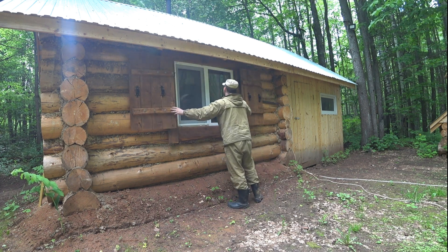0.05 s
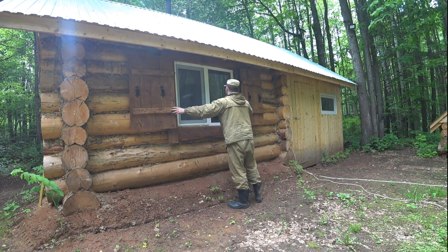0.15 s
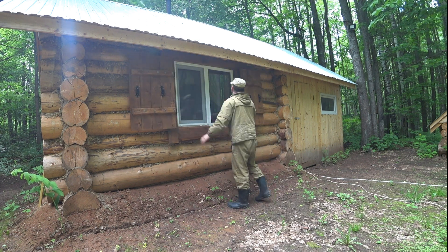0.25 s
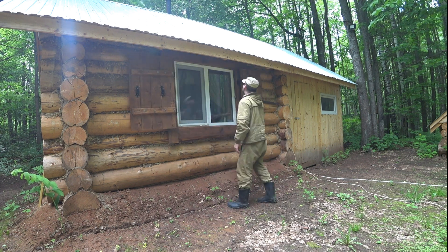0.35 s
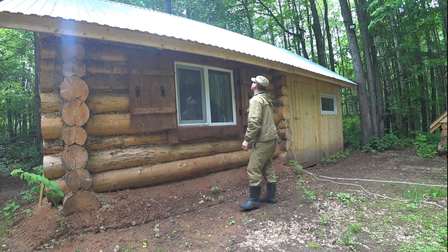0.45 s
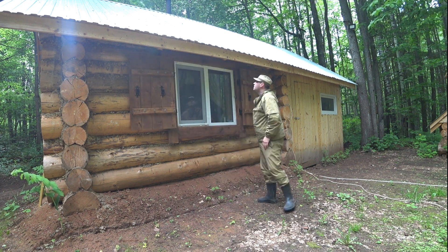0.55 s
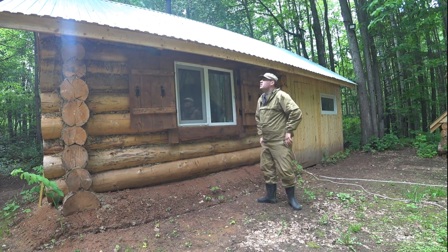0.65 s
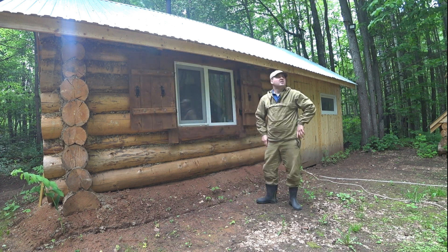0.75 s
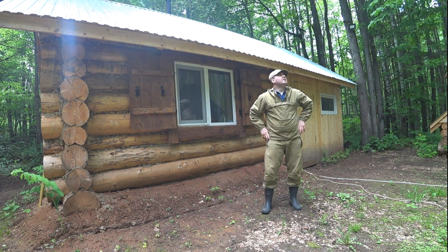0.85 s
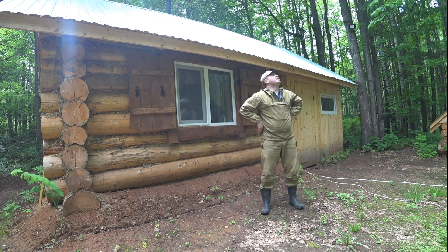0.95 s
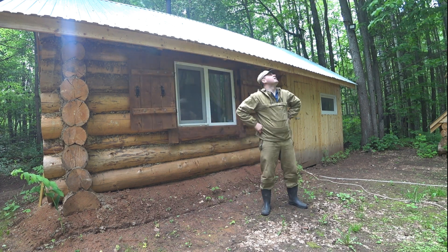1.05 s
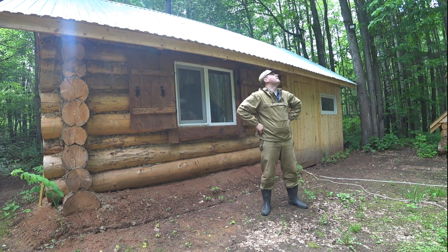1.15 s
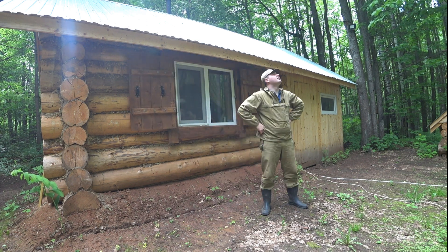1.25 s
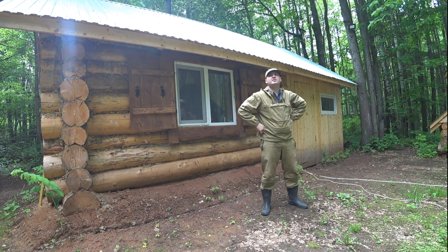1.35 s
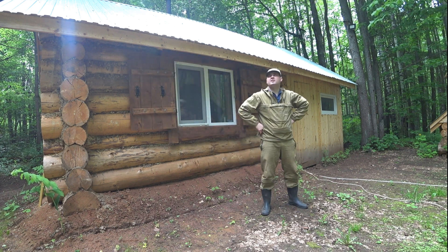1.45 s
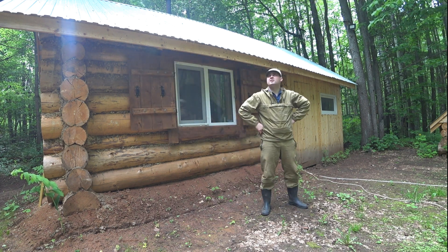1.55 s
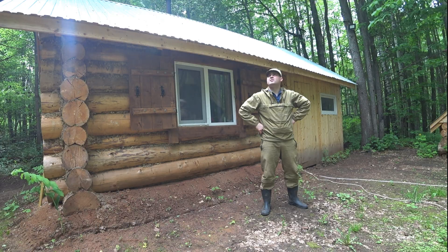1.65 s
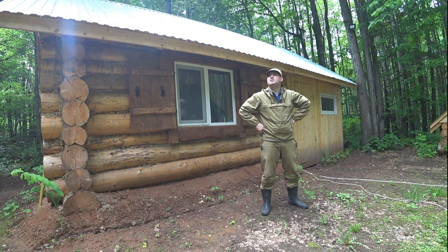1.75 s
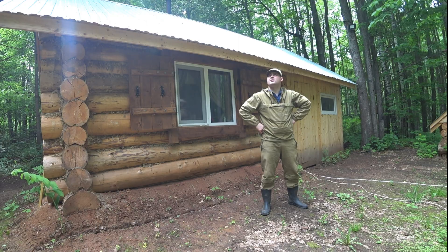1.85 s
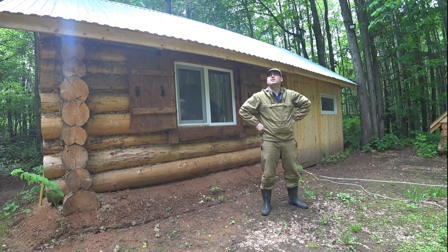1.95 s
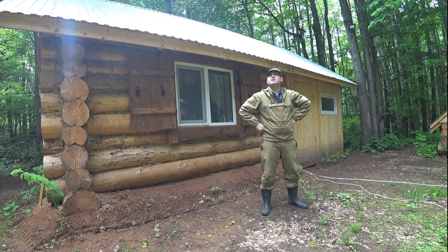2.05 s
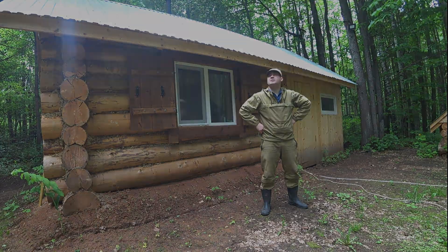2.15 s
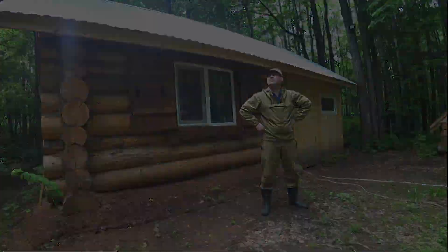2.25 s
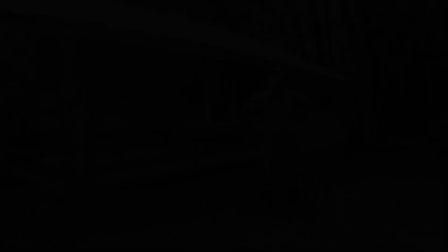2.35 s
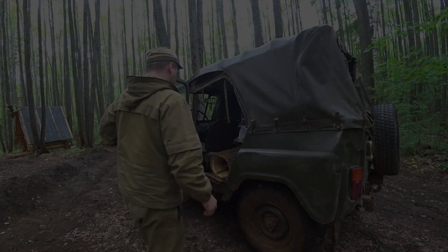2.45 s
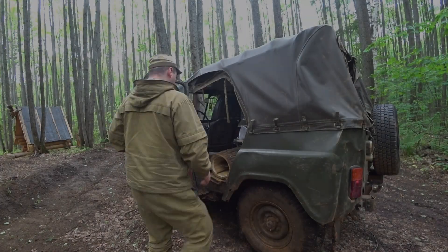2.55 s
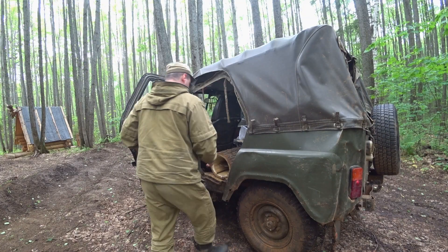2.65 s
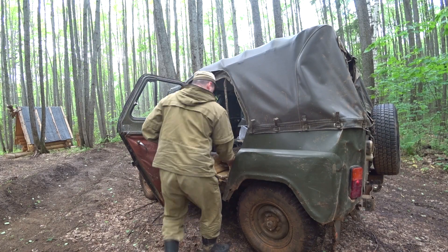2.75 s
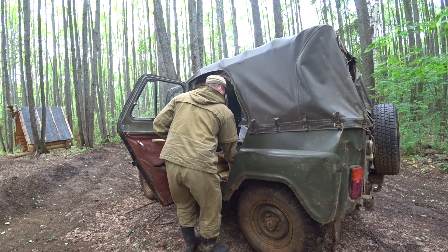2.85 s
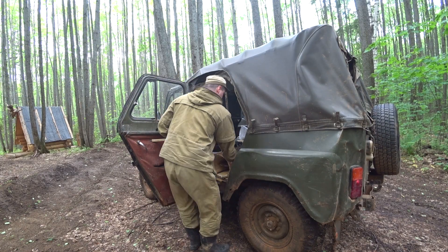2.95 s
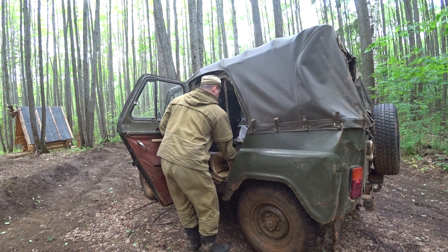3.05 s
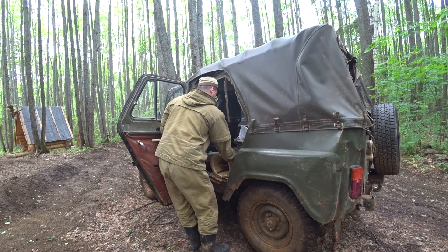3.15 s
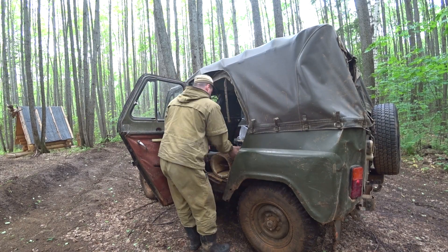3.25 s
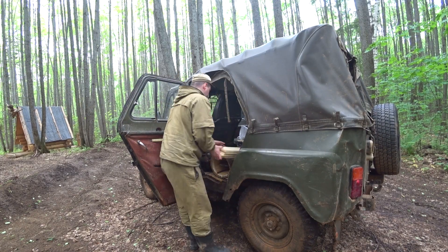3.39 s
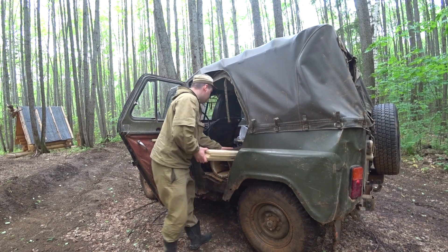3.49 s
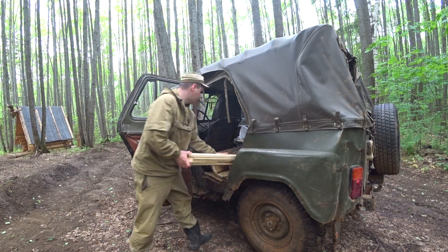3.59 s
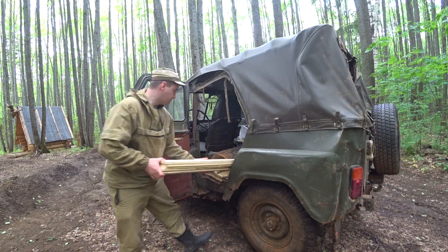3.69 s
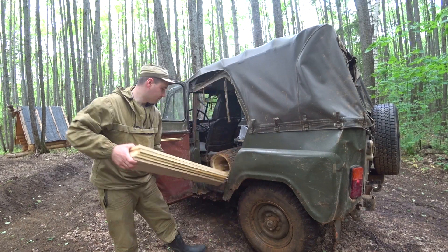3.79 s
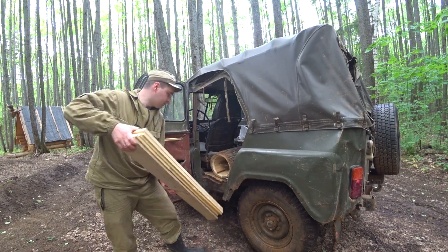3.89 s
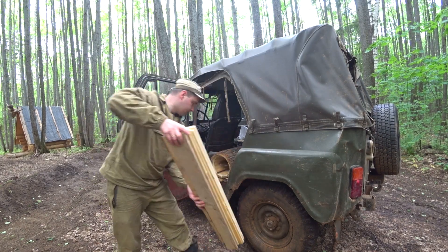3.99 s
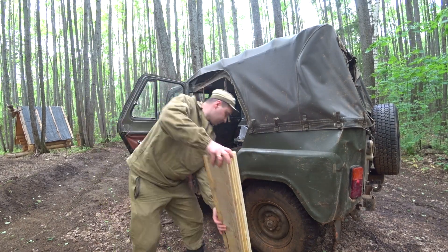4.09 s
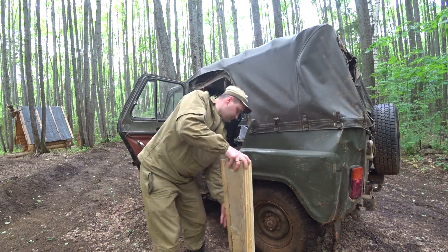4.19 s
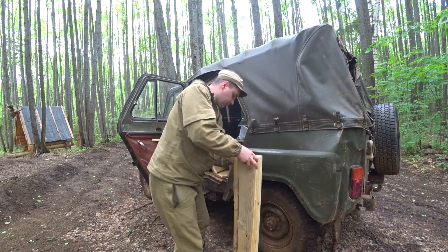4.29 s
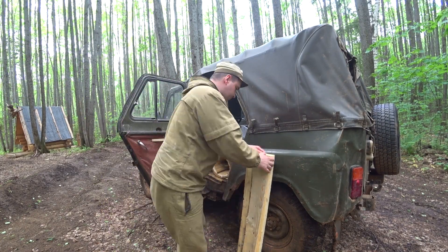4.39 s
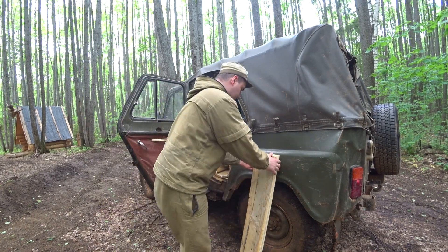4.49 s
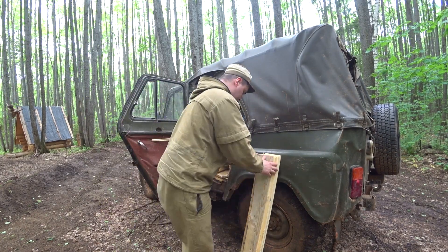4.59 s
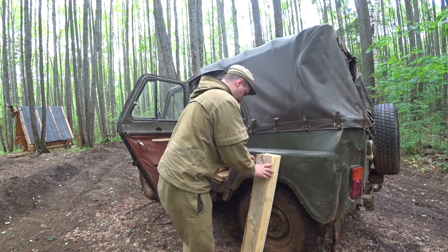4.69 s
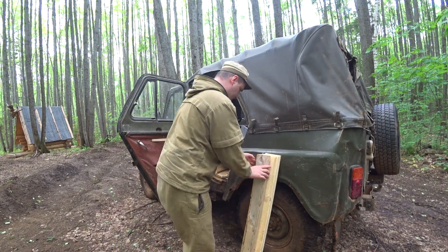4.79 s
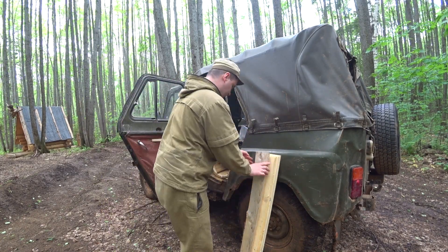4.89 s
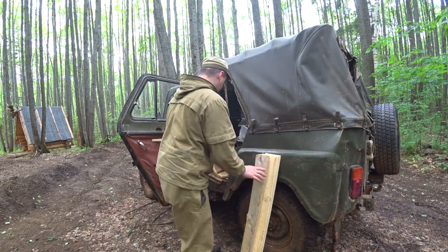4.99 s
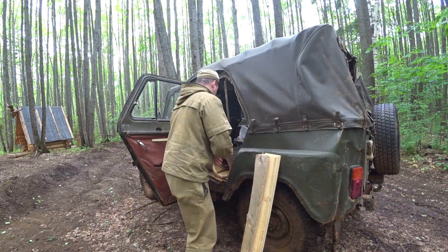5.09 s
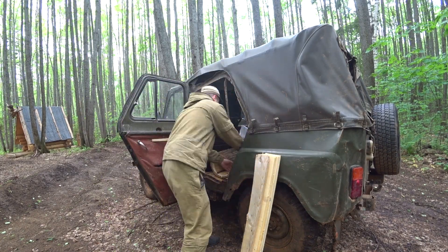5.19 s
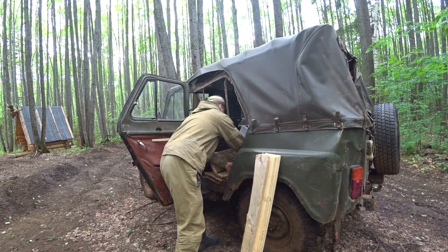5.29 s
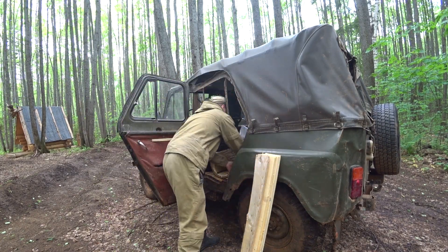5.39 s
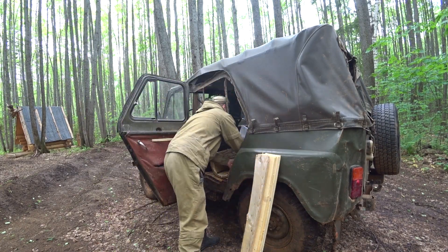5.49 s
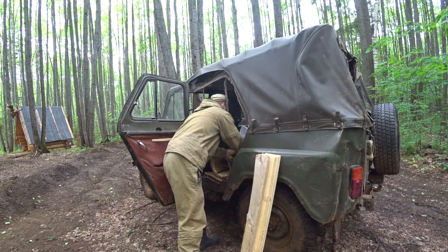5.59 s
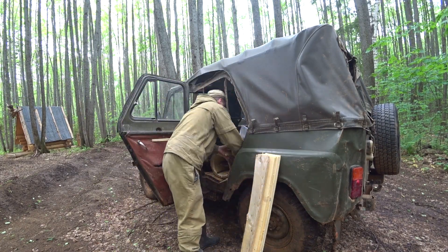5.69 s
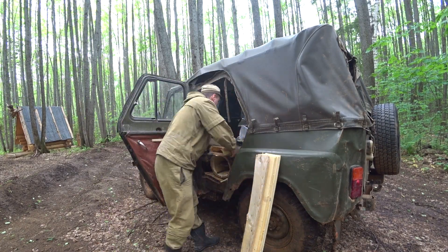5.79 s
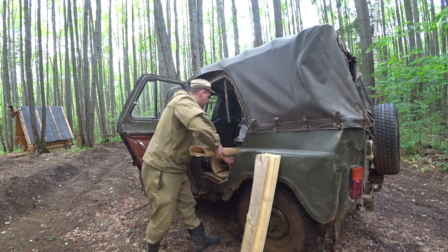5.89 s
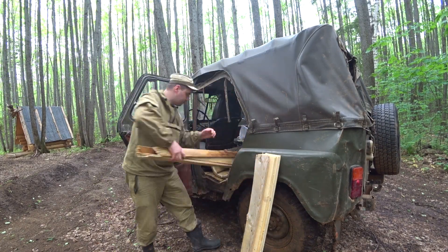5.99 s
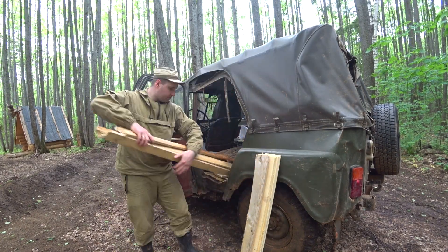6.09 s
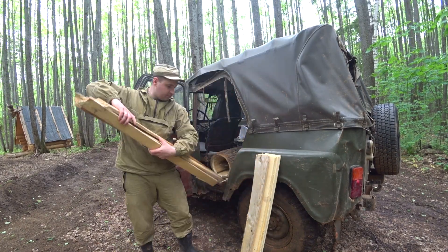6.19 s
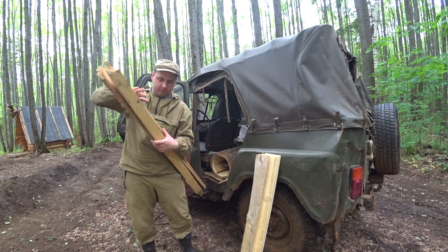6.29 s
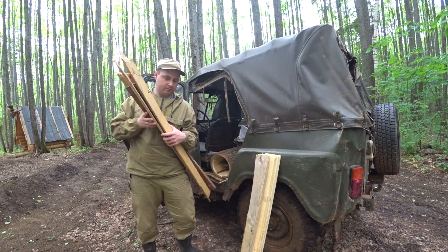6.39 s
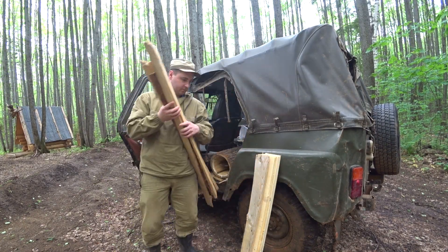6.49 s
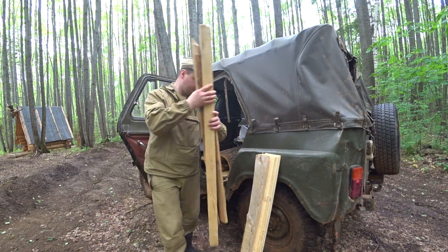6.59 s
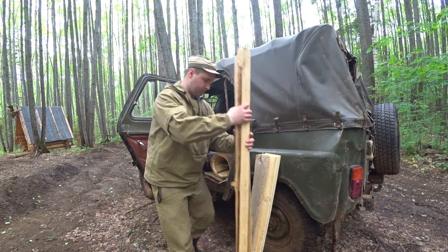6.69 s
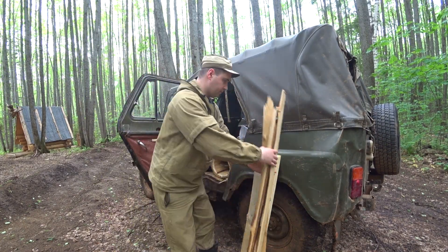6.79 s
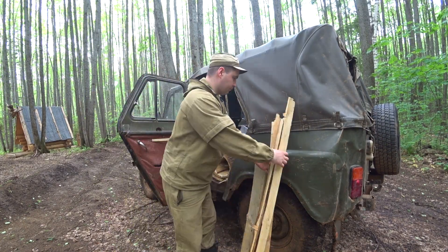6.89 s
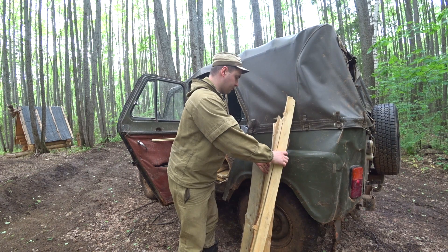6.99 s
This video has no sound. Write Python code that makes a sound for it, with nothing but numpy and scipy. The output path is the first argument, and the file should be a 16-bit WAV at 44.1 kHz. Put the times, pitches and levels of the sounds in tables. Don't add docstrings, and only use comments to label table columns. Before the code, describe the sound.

In a quiet forest, close to the microphone, a wooden shutter knocks softly while distant birds whistle thinly and leaves and cloth rustle. After a small rubber boot squeak, the air grows fuller. Planks rasp across a car sill, clap together and are stood on the ground with a hard, hollow crack. Thin laths then clatter, scrape and tap against the metal wing, all dry with hardly any echo.

```python
import sys
import numpy as np
from scipy import signal
from scipy.fft import rfft, irfft
from scipy.io import wavfile
from scipy.ndimage import uniform_filter1d

SR = 44100
rng = np.random.default_rng(int(sys.argv[2]) if len(sys.argv) > 2 else 0)


def transcribe(u):
    v = np.clip(np.atleast_2d(u).T, -1, 1)
    q = np.round(v * 32767).astype(np.int16)
    wavfile.write(sys.argv[1], SR, q)


def invert_db(x):
    u = np.asarray(x, float) / 20
    return 10 ** u


N = 310464
HANDS_FROM_S = 2.4


def evened(x):
    return x / np.sqrt(np.mean(x ** 2) + 1e-20)


def read(points, hz):
    f, value = np.transpose(points)
    return np.interp(np.log(hz + 1), np.log(f + 1), value)


def follow(rows, t):
    s, *columns = np.transpose(rows)
    return [np.interp(t, s, c) for c in columns]


def add(mix, s, sound):
    part = mix[round(s * SR):][:len(sound)]
    part += sound[:len(part)]


def band(x, lo_hz, hi_hz):
    return signal.sosfilt(signal.butter(2, [lo_hz, hi_hz], "bandpass", fs=SR, output="sos"), x)


def ring(hz, t60, t):
    return invert_db(-60 * t / t60) * np.sin(2 * np.pi * hz * t)


def swells(rows, t):
    s, reach, db, *traits = np.transpose(rows)[:, :, None]
    reach = reach * np.where(t > s, 0.86, 1)
    fall_db = 19.5 * (abs(t - s) / reach) ** 1.076
    return invert_db(db - fall_db), *traits


# from_s, thud_db (relative to the body), scuff_rattle_t60_s
SUPPORTS = [(0, -3.5, 0.019), (.6, -3, 0.3), (1.5, -10, 0.048), (3.55, -12, 0.04), (4.08, -4.5, 0.047),
            (4.42, -13, .1), (4.5, 0.5, 0.105), (5.15, -14, 0.069), (5.95, -26.5, 0.0418),
            (6.68, -2, 0.036), (6.865, -8, .03)]


def support(s):
    return [row[1:] for row in SUPPORTS if row[0] <= s][-1]


def knock(clack_db, body_db, tick_db, thud_db, t60, rise, crack):
    t = np.arange(5000) / SR
    swell = (1 - np.exp(-(t / rise) ** 2)) * invert_db(-60 * t / t60)
    chatter = rng.standard_normal(len(t)) * (0.11 + (rng.random(len(t)) < .1)) * swell
    chatter[20:23] += crack * np.array([1, .8, -.6])
    body_db = clack_db + body_db
    ranges = [(240, 416, 0.024, body_db + thud_db, 2),
              (432, 2485, 0.0171, body_db, 8),
              (1620, 7476, 0.0078, clack_db, 10),
              (5385, 16000, 0.0036, clack_db + tick_db, 10)]
    out = 0
    for lo_hz, hi_hz, mode_t60, db, count in ranges:
        places = (np.arange(count) + .3 + .4 * rng.random(count)) / count
        modes = 0
        for k, place in enumerate(places):
            mode = ring(lo_hz * (hi_hz / lo_hz) ** place, mode_t60, t[:1600])
            modes = modes + (-1) ** k * np.sin(np.pi * place) ** 0.57 * mode
        part = band(signal.fftconvolve(chatter, modes)[:len(t)], .85 * lo_hz, 1.1 * hi_hz)
        loudest = np.sqrt(uniform_filter1d(part ** 2, 200).max())
        out = out + invert_db(db - 8.5) * part / loudest
    return out


# peak_s, clack_peak_db, body_db (relative to clack), tick_db (relative to clack), rattle_t60_s
KNOCKS = [(0.0354, -34.5, 3, -13, 0.069), (0.044, -36.5, -6, -14, 0.04),
          (0.0545, -47.5, 14.5, 6, 0.031), (0.1, -64, 21, 5, 0.047), (0.116, -61, 20.5, 4, 0.028),
          (2.1842, -46, -7, -9.5, 0.048), (2.2086, -45, -11, -7, 0.087), (2.3551, -38.5, -1, -4, 0.1),
          (3.164, -44.5, 9.5, -18, 0.046), (3.7436, -29.5, -6.5, -19, 0.038),
          (3.8245, -30.5, 2, 5, 0.011), (3.8464, -38.5, -20, 12.5, 0.0124),
          (4.363, -24, -16.5, -9, 0.0148), (4.372, -34, -11, -5, 0.027), (4.481, -13, -2, -3, 0.0163),
          (4.4851, -11.5, -30.5, -24.5, 0.065), (4.4926, -38, 16, 6, 0.0395),
          (4.5055, -19, -6.5, -10, 0.013), (4.516, -25, -7.5, -19, 0.018),
          (4.537, -27.5, -27.5, -7, 0.04), (4.607, -39, -20.5, -3, 0.051),
          (4.948, -21.5, -7, 0, 0.0138),
          (5.3834, -11, -13, -13, 0.053), (5.4823, -27, -3, -12, 0.066),
               (5.5769, -28, -9, -10.5, 0.068), (5.7964, -26, -9.5, -4.5, 0.034),
               (6.098, -32, -13, 12, 0.07), (6.1466, -24, 0, 10, 0.044), (6.159, -19, -9, 2.5, 0.028),
               (6.176, -25, -3.5, -17, 0.09), (6.2304, -26, -4, -10.5, 0.038),
               (6.314, -28.5, -8, -30, 0.015), (6.4703, -32.5, -2, -3, 0.025),
               (6.556, -40.5, -21, 8, 0.024), (6.7693, -50, -16, 4, 0.027), (6.83, -32.5, -4.5, 12.5, 0.03),
               (6.836, -30, -10, 4.5, 0.0326), (6.874, -38, 2, -14.5, 0.019), (6.903, -40.5, -21, 9, 0.02),
               (6.9507, -34, -1, -7, 0.044)]


def hard_knocks(wood):
    for s, clack_db, body_db, tick_db, t60 in KNOCKS:
        blow = knock(clack_db, body_db, tick_db, support(s)[0], t60, rise=0.00089, crack=0.76)
        add(wood, s - .001, blow)


# peak_s, clack_peak_db, body_db (relative to clack), tick_db (relative to clack), rattle_t60_s
SNAPS = [
    (6.1078, -28, -20, 12, .012),
    (6.1115, -27, -18, 9, .01),
    (6.1258, -24, -10, -2, .02),
    (6.1685, -42, -20, 16, .012),
    (6.1405, -44, -20, 15, .04),
    (4.0215, -35, -20, 7, 0.013),
    (4.161, -27.5, -9, 2, 0.016),
]


def edge_snaps(wood):
    for s, clack_db, body_db, tick_db, t60 in SNAPS:
        add(wood, s - .001, knock(clack_db, body_db, tick_db, -20, t60, rise=0.00093, crack=0.7))


# peak_s, clack_peak_db,
# body_db (relative to clack), tick_db (relative to clack)
SCUFFS = [(0.34, -43.5, 0.5, -12), (0.8942, -52, -7.5, 0.5), (0.975, -51, -15, -10),
          (2.006, -55.5, 1, 9), (2.896, -47, -3, 8), (3.127, -47, 10, -14), (3.205, -42, 1.5, -3),
          (3.445, -53, 15.5, 3), (3.6848, -34, -13, -3), (3.808, -23, -6, -11.5),
          (4.016, -40, -19.5, 4), (4.131, -38.5, -23, 3.5), (4.154, -35, -9, 3),
          (4.207, -41.5, -14, 5), (4.27, -49, -9, 6), (4.546, -32, -23.5, -10.5),
          (4.5718, -41, -25, -14), (4.8295, -50, -1, -2),
          (5.329, -42.5, 5.5, -16.5), (5.3494, -42, 3.5, -2.5), (5.3975, -39, 9, 3),
               (5.4135, -34.5, -12, -19.5), (5.5181, -43, 12.5, -4.5), (5.5269, -25, -3.5, -15.5),
               (5.5615, -41, 3.5, -7), (5.5919, -40, 2.5, 3.5), (5.6276, -49, 12.5, -8),
               (5.6677, -46, -15, 5), (6.103, -35.5, -10, 12.5), (6.12, -29, -5.5, 7), (6.164, -28, -5, -8),
               (6.245, -27.5, -8, 0), (6.2668, -41.5, 3, 7), (6.4349, -48.5, 11, 15.5),
               (6.4421, -28.5, -11, -4.5), (6.545, -38.5, -20, 2), (6.607, -39.5, -25.5, -4.5),
               (6.8118, -35.5, -13, -2), (6.844, -33, -16.5, 13), (6.8485, -27.5, -6, -9)]


def scuffs(wood):
    for s, clack_db, body_db, tick_db in SCUFFS:
        thud_db, t60 = support(s)
        add(wood, s - .003, knock(clack_db, body_db, tick_db, thud_db, t60, rise=0.0055, crack=0))


# peak_s, clack_peak_db, body_db (relative to clack), tick_db (relative to clack), rattle_t60_s
TAPS = [(.21, -51, -2, -10, 0.067), (.95, -52, -9, -10, .05), (1.02, -54, -1, -10, 0.084),
        (1.984, -51, -2.5, -6, .02), (2.447, -48, -2.5, -7, .03), (2.485, -50, -0.5, -7.5, 0.038),
        (3.448, -48, -10, 4, 0.017), (3.6076, -40, -15, -5.5, .03), (3.647, -36, -12, -8, .03),
        (4.556, -31.5, -24, -13.5, 0.0256), (4.583, -40.5, -25, -12, 0.032), (4.593, -42, -20, -14, 0.027)]


def taps(wood):
    for s, clack_db, body_db, tick_db, t60 in TAPS:
        tap = knock(clack_db, body_db, tick_db, support(s)[0], t60, rise=0.00255, crack=0)
        add(wood, s - .002, tap)


# start_s, peak_db, pitch_hz, t60_s
THUMPS = [(0, -35, 75, 0.37), (.036, -35, 112, 0.32), (.036, -19.5, 189, 0.039), (.1, -28.5, 159.6, 0.072),
          (3.849, -36, 148, 0.15), (4.163, -7, 231, 0.024), (4.4866, -4.5, 328, 0.052),
          (4.951, -28, 169, 0.042), (5.798, -21, 267, 0.0163), (3.45, -33, 136.4, 0.099),
          (4.951, -22.5, 310, 0.088), (6.829, -12.5, 318, 0.016), (6.8528, -2, 317, 0.015),
          (7.02, -28, 230, 0.024), (6.876, -37, 234.5, 0.27)]
# start_s, peak_db, pitch_hz, t60_s
RINGS = [(.035, -18, 588, 0.03), (0.043, -10.5, 1190, 0.0149), (0.054, -16, 974, 0.058),
         (.111, -32, 1400, 0.059), (.1, -29, 700, .03), (.122, -33, 1050, 0.033), (.342, -31, 550, .02),
         (3.162, -29, 900, 0.098), (3.808, -23.5, 2420, 0.019), (3.607, -23, 5580, .02),
         (3.68, -28.5, 6950, .04), (3.822, -8.5, 5380, 0.017), (4.374, -15, 2950, 0.014),
         (4.48, -0.5, 770, 0.0384), (4.481, -10, 6350, .012), (4.496, -26, 2953, .05),
         (4.515, -13, 3115, 0.023), (4.482, -3, 3970, 0.013), (4.4845, -6, 634, 0.079),
         (4.492, -8.5, 1575, 0.054), (4.505, -2.5, 4370, 0.01), (4.538, -26, 6440, .02),
         (4.55, -27, 4600, .05), (4.607, -30, 4530, .04), (4.540, -25, 2612, 0.097),
         (4.542, -23, 3950, 0.06), (4.9478, -5.5, 5200, 0.0131), (4.947, -5, 7293, 0.0067),
         (4.9472, -7, 6340, .008), (4.947, -16, 11220, .008), (4.948, -17, 3000, 0.017),
         (4.947, -15, 3760, 0.015), (5.384, -5.5, 3000, 0.045), (5.384, -7.5, 2320, 0.036),
         (5.384, -2, 4870, 0.015), (5.482, -13, 2914, 0.0275), (5.482, -18.5, 4020, 0.025),
         (5.518, -24.5, 990, 0.076), (5.797, -23.5, 742, 0.073), (5.797, -17, 3550, 0.011),
         (6.859, -22, 1620, 0.04),
         (2.358, -34, 950, .04), (2.358, -34, 3170, .02), (2.9, -38, 3600, .02), (3.131, -36, 2100, .02),
         (3.163, -28, 2000, .015), (3.453, -28, 800, .04), (4.021, -19, 6950, .01),
         (4.161, -16.5, 6500, .012), (4.165, -27, 235, 0.15), (4.207, -25, 5840, .02),
         (4.268, -34, 5920, .06), (4.4805, -13.5, 1218, .05), (4.494, -12, 794, .04),
         (4.512, -17, 640, .04), (4.516, -19, 350, 0.073), (4.563, -30, 2600, .05), (4.57, -33, 4600, .03),
         (4.58, -33, 4900, .03), (4.591, -35, 3500, .03), (4.614, -34, 2650, .05), (3.164, -36, 3600, .015),
         (6.232, -22, 3270, .02), (6.61, -36, 4600, .04), (6.858, -26, 2000, .04), (5.384, -11, 5440, .02),
         (5.384, -14, 4340, .04), (6.445, -19, 4020, .03), (6.85, -22, 804, .02),
         (6.952, -29.5, 680, 0.033)]


def tones(wood):
    t = np.arange(6000) / SR
    for s, db, hz, t60 in THUMPS + RINGS:
        onset = np.tanh(t * hz / 0.5)
        add(wood, s, invert_db(db - 11.5) * ring(hz, t60, t) * onset)


def fibre_catches():
    sizes = invert_db(3.16 * np.minimum(rng.exponential(1, N), 3.6))
    clicks = sizes * (rng.random(N) < 6000 / SR) * rng.choice([-1, 1], N)
    judder = invert_db(0.765 * evened(uniform_filter1d(rng.standard_normal(N), 300)))
    return judder * (evened(clicks) + 0.47 * rng.standard_normal(N))


# frequency_hz, level_db (per Hz)
GRAIN = [(710, -63), (1200, -4), (2130, -0.5), (4040, -1.5), (4410, -3), (5780, -2), (7490, -7), (9820, -6),
         (16000, -8.5)]


def fibre_hiss(catches):
    hz = np.fft.rfftfreq(N, 1 / SR)
    hiss = irfft(rfft(catches) * invert_db(read(GRAIN, hz)) * (hz < 15800), N)
    z = signal.stft(hiss, nperseg=256)[2]
    knots = uniform_filter1d(rng.standard_normal(z.shape), size=4, axis=0)
    knots = evened(uniform_filter1d(knots, size=14, axis=1))
    hiss = signal.istft(z * invert_db(2.57 * knots), nperseg=256)[1][:N]
    return hiss / np.std(band(hiss, 2902, 5237))


# pitch_hz, width_hz, level_db
HOLLOW = [
    (460, 12, 22.5),
    (974, 1450, 15),
]


def hollow_drum(catches):
    t = np.arange(4000) / SR
    body = sum(invert_db(db) * ring(hz, 3.4 / width, t) * width for hz, width, db in HOLLOW)
    resonant = evened(signal.oaconvolve(catches, body)[:N])
    direct = evened(band(catches, 340, 2660))
    return band(resonant + 0.56 * direct, 102.3, 2850)


# peak_s, reach_s, rubbing_db, hollow_db (relative to rubbing)
STROKES = [(2.95, 1, -64, 6.5), (3.43, 0.253, -48, 3), (3.6, 0.34, -48.5, -6), (3.73, 0.17, -43, 4),
           (4.12, 0.44, -55.5, -4), (4.575, .09, -48, -20), (4.6, 0.35, -59, 1.5),
           (5.39, 0.071, -54.5, 16.5), (5.62, 0.37, -64, 18.5), (5.925, .07, -48, -2),
           (5.99, 0.16, -41.5, 1), (6.17, 0.26, -45, 1.5), (6.47, 0.079, -51.5, 1.5),
           (6.542, 0.029, -46, -15), (6.9, 0.25, -57.5, 1)]
# time_s, level_db
HANDS = [(2.4, -75), (2.75, -59), (3.3, -61), (3.84, -65), (3.87, -61), (4.4, -59.5), (5.1, -62),
         (5.45, -59.5), (5.88, -61), (6.38, -58.5), (6.42, -66), (6.5, -60), (6.585, -72), (6.66, -60),
         (6.72, -63), (6.8, -61), (7.04, -59)]
# peak_s, level_db
BOOMS = [
    (3.815, -46),
    (4.161, -52),
    (4.485, -25),
    (4.949, -39.5),
    (5.388, -38),
    (6.848, -38.5),
]


def drag():
    t = np.arange(N) / SR
    slow = t[::32]
    gains, hollow_db = swells(STROKES, slow)
    hands = invert_db(follow(HANDS, slow)[0])
    rub = np.interp(t, slow, np.sqrt((gains ** 2).sum(0) + hands ** 2))
    drummed = ((gains * invert_db(hollow_db)) ** 2).sum(0) + (hands * invert_db(-4)) ** 2
    booms = 0
    for s, db in BOOMS:
        down_db = np.where(t < s, 4000 * (s - t), 365 * (t - s))
        booms = booms + invert_db(db - down_db)
    hollow = np.sqrt(np.interp(t, slow, drummed) + booms ** 2)
    catches = fibre_catches()
    begun = np.clip((t - HANDS_FROM_S) / 0.31, 0, 1)
    return begun * invert_db(-1.0) * (rub * fibre_hiss(catches) + invert_db(-4.5) * hollow * hollow_drum(catches))


def slips(s, length, db, from_hz, to_hz):
    return [(s, db - 16.5, from_hz), (s + 0.0061, db, from_hz),
            (s + length - 0.018, db - 1.5, to_hz), (s + length, db - 22.5, to_hz)]


# multiple, level_db
SQUEAK_ORDERS = [(1, -2), (2, 1), (3, -7), (4, 3.5), (5, -17.5), (6, -12), (7, -15), (8, -16), (9, -12),
                 (10, -20.5)]


def squeak(rows):
    t = np.arange(rows[0][0], rows[-1][0], 1 / SR)
    db, hz = follow(rows, t)
    wander = 1 + .08 * uniform_filter1d(rng.standard_normal(len(t)), 150)
    turns = np.cumsum(hz * wander) / SR
    stack = 0
    for k, level_db in SQUEAK_ORDERS:
        softness_db = 0.76 * (db + 44.5) * (k - 1) ** .5
        stack = stack + invert_db(level_db + softness_db) * np.sin(2 * np.pi * k * turns)
    stack *= 1 + 0.19 * evened(uniform_filter1d(rng.standard_normal(len(t)), 60))
    return invert_db(db) * evened(stack) * signal.windows.tukey(len(t), .25)


# start_s, length_s, level_db, from_hz, to_hz (slips per s)
SQUEAKS = [
    (2.076, 0.025, -47.5, 475, 460),
    (2.115, 0.059, -43.5, 452, 493),
]


def boot(wood):
    for row in SQUEAKS:
        add(wood, row[0], squeak(slips(*row)))


# frequency_hz, left_right_db
LEAN = [(500, 0), (1000, 1.6), (2000, 3), (4000, 4), (8000, 4.8), (15000, 4.5)]


def ears(x):
    hz = np.fft.rfftfreq(N, 1 / SR)
    late_s = .00002
    left = invert_db(read(LEAN, hz) / 2) * np.exp(-1j * np.pi * np.minimum(hz, 5500) * late_s)
    return irfft(rfft(x) * np.array([left, 1 / left]), N)


# frequency_hz, t60_s
TREES = [(150, 0.041), (1000, 0.087), (5000, 0.0092), (15000, 0.019)]


def trees(x):
    echoes = np.zeros((2, 12000))
    at = np.arange(100, 11960, 20) + rng.integers(0, 20, (2, 593))
    np.put_along_axis(echoes, at, rng.choice([-1., 1.], at.shape), 1)
    hz, t, z = signal.stft(echoes, SR, nperseg=128)
    decay = invert_db(-60 * t / read(TREES, hz)[:, None])
    low_cut = np.tanh((hz / 1800) ** 2)[:, None]
    tail = signal.istft(z * decay * low_cut, SR, nperseg=128)[1]
    return signal.fftconvolve(x[None], tail / np.linalg.norm(tail[0]), axes=1)[:, :N]


# peak_s, reach_s, level_db, centre_hz, width_hz
SWISHES = [(0.0, 0.2, -45.5, 9800, 1500), (.01, .08, -55, 13000, 700), (.1, .14, -48, 12600, 1300),
           (.17, .12, -47, 9500, 900), (.25, .25, -56.5, 9450, 2000), (.27, .06, -62, 8000, 250),
           (0.8, 1, -64, 9950, 1500), (0.9, .04, -58.5, 11000, 5000), (1.78, 0.41, -58.5, 11500, 600),
           (1.93, .2, -54.5, 10100, 500), (2.06, .06, -54.5, 15300, 500), (2.12, 0.224, -53, 10740, 700),
           (2.3, 0.52, -52.5, 9500, 900), (2.7, 0.59, -50.5, 11160, 704), (2.87, 0.25, -49.5, 9000, 2000),
           (2.945, 0.08, -46.5, 13800, 1200), (3.02, 0.094, -48, 8800, 1200), (3.4, .3, -57, 10000, 2500),
           (3.725, .04, -48, 12000, 2500), (3.93, 0.39, -53, 10000, 2500), (4.31, 0.69, -52.5, 9300, 2500),
           (4.79, 0.49, -55.5, 9900, 2500), (5.76, 0.25, -50.5, 11200, 1200),
           (6.02, 0.48, -45.5, 10100, 3000), (6.35, .1, -45, 12000, 4000), (6.45, .06, -44, 13000, 4000),
           (6.54, 0.045, -42, 12000, 5000), (6.615, 0.035, -58, 11000, 5000),
           (6.67, 0.055, -52, 11000, 4000), (5.675, .03, -54, 10000, 2500), (5.9, .2, -49, 11500, 500),
           (6.755, .04, -50, 10000, 4000), (6.82, .06, -50, 13000, 3000), (6.47, .07, -50, 14500, 1500),
           (6.925, .05, -52, 14000, 2500), (5.2, .4, -56, 14500, 2000), (3.86, .05, -52, 15000, 1500),
           (6.95, .2, -50.5, 13000, 3000)]


def rustle(hz, t, patches):
    gains, centres_hz, widths_hz = swells(SWISHES, t)
    humps = 0.28 * (hz.T > 7000) + np.exp(-((hz.T - centres_hz) / widths_hz) ** 2)
    humps = humps / np.linalg.norm(humps, axis=1, keepdims=True)
    return np.sqrt((humps ** 2).T @ gains ** 2) * invert_db(-1.5 + 2.4 * patches)


# time_s, level_db
AIR = [(0.0, -57), (0.31, -60), (1.9, -62), (2.61, -55), (5.85, -56), (6.14, -53.5), (6.5, -58),
       (7.04, -56.5)]
# frequency_hz, level_db (per Hz)
AIR_COLOUR = [(25, -2.5), (50, -6.5), (100, 1.5), (185, -0.5), (300, -3), (600, -1), (1200, -2.5),
              (2500, -4.5), (3800, -4), (5000, -7.5), (6500, -8), (9000, -10.5), (12000, -8),
              (16000, -13.5)]


def air(hz, t, patches):
    colour = invert_db(read(AIR_COLOUR, hz))
    return colour / np.linalg.norm(colour[1:18]) * invert_db(follow(AIR, t)[0] + 0.16 * patches)


# frequency_hz, likeness (0 to 1)
AIR_SAME = [(60, 1), (300, 0.87), (1000, 0.45), (3000, 0.57), (6000, 0.41), (15000, 0.3)]


def forest():
    frames, hz = N // 128 + 5, np.fft.rfftfreq(512, 1 / SR)[:, None]
    t = np.arange(frames) * 128 / SR
    a, b, c, d, patches = rng.standard_normal((frames, 257, 5)).T
    patches = evened(uniform_filter1d(uniform_filter1d(patches, 12, 0), 24, 1))
    flicker_db = 0.32 * evened(uniform_filter1d(rng.standard_normal(frames), 6))
    level = np.hypot(air(hz, t, patches), rustle(hz, t, patches)) * invert_db(flicker_db)
    same = np.clip(read(AIR_SAME, hz), -1, 1)
    left = a + 1j * b
    right = same * left + np.sqrt(1 - same ** 2) * (c + 1j * d)
    z = np.array([left, right]) * level
    lead_s = 0.0001094 * (t < HANDS_FROM_S)
    z[0] *= invert_db(0.9949) * np.exp(2j * np.pi * hz * lead_s)
    z *= hz < 15800
    return invert_db(-0.5) * signal.istft(z, nperseg=512, noverlap=384)[1][:, :N]


# start_s, length_s, pitch_hz, level_db
BIRDS = [
    (0.379, 0.1, 6600, -67),
    (0.678, .17, 6800, -70),
    (1.242, 0.12, 6700, -65),
    (1.5, 0.235, 5560, -70),
    (1.996, 0.12, 6500, -63),
    (0.394, 0.32, 11200, -66),
    (1.728, 0.14, 11550, -63),
    (2.623, 0.23, 11630, -52.5),
]


def birds():
    out = np.zeros((2, N))
    for s, length, hz, db in BIRDS:
        size = round(length * SR)
        for ear in out:
            whistle = evened(band(rng.standard_normal(size), .98 * hz, 1.02 * hz))
            add(ear, s, invert_db(db) * whistle * np.hanning(size) ** 0.25)
    return out


def scene():
    wood = drag()
    for play in (hard_knocks, edge_snaps, scuffs, taps, tones, boot):
        play(wood)
    wood = signal.sosfilt(signal.butter(2, 70, "highpass", fs=SR, output="sos"), wood)
    return ears(wood) + invert_db(-16) * trees(wood) + forest() + birds()


def band_limit(x):
    return signal.sosfilt(signal.butter(12, 16970, fs=SR, output="sos"), x)


def record(dry):
    hz = np.fft.rfftfreq(N, 1 / SR)
    limited = irfft(rfft(dry) * np.where(hz < 15950, 1, invert_db(-30)), N)
    return band_limit(limited)


dry = scene()
out = record(dry)
transcribe(out)
```